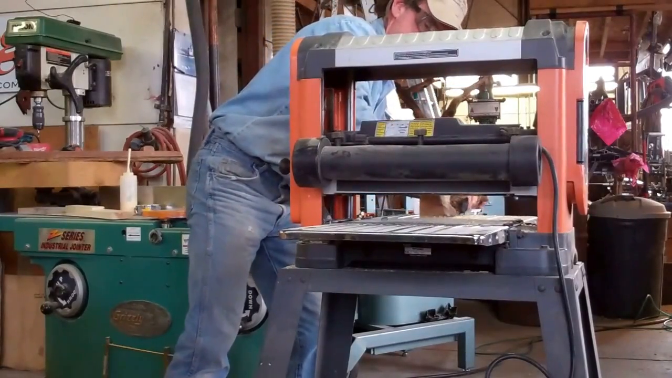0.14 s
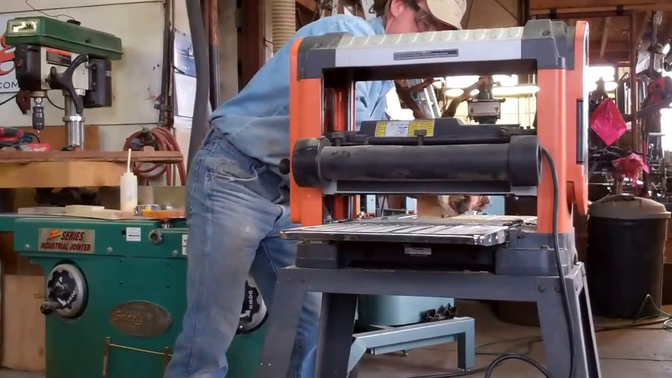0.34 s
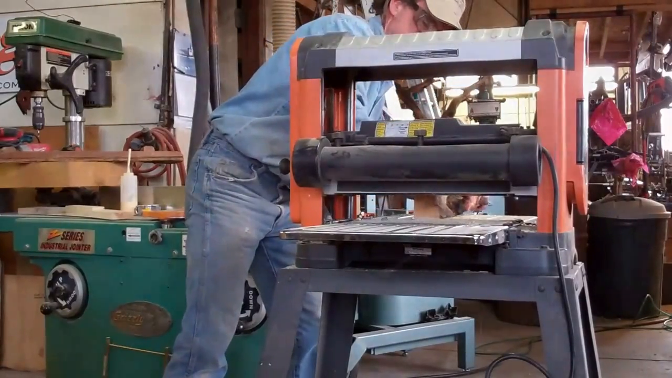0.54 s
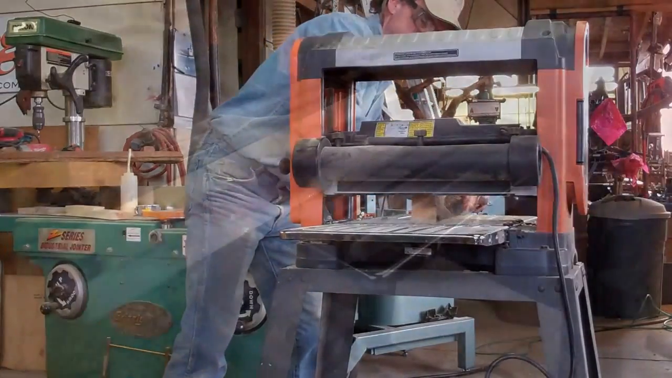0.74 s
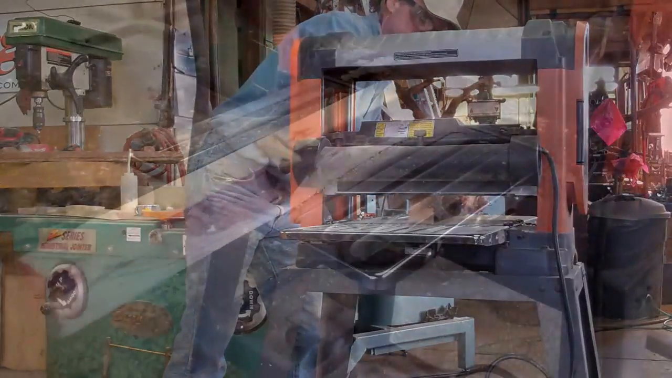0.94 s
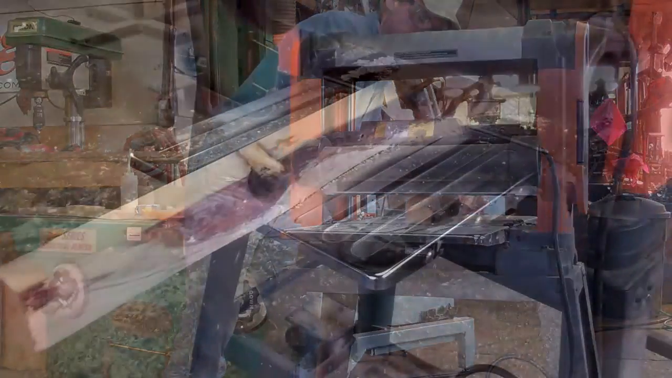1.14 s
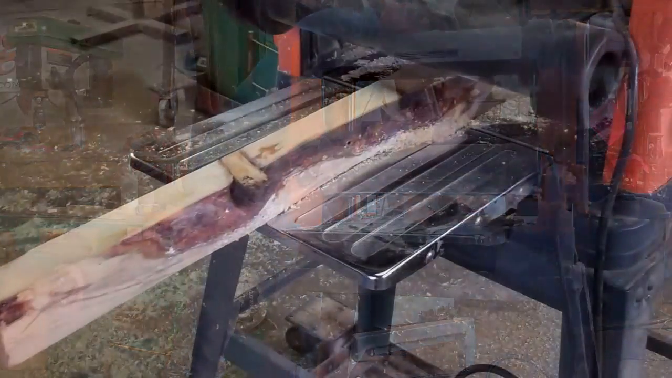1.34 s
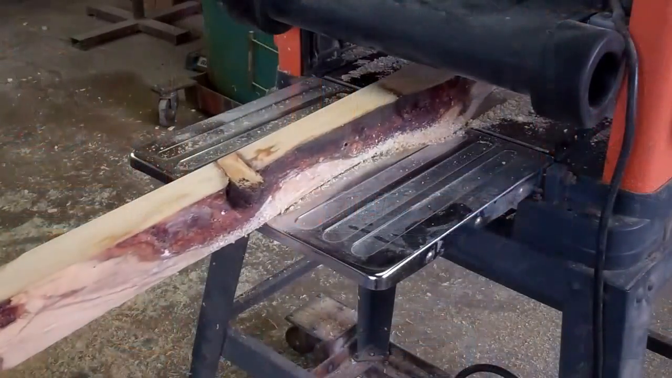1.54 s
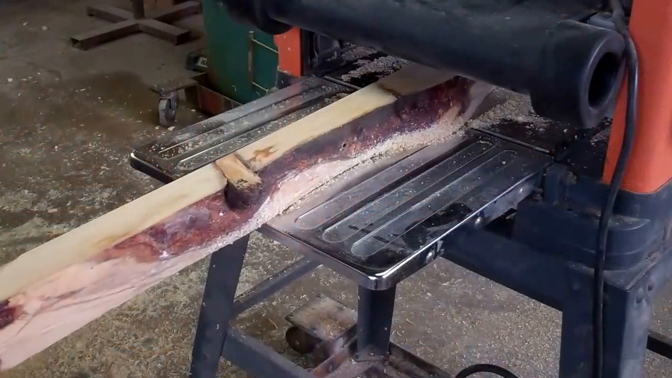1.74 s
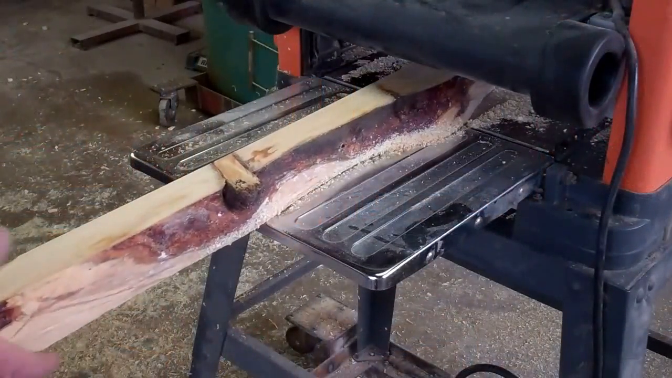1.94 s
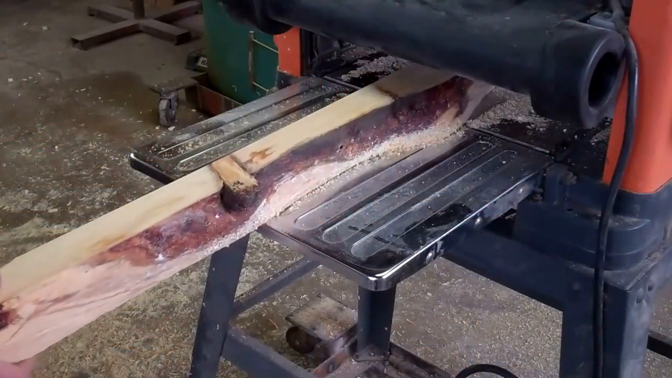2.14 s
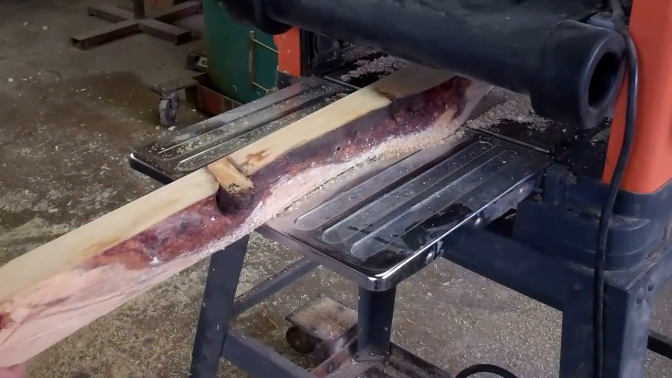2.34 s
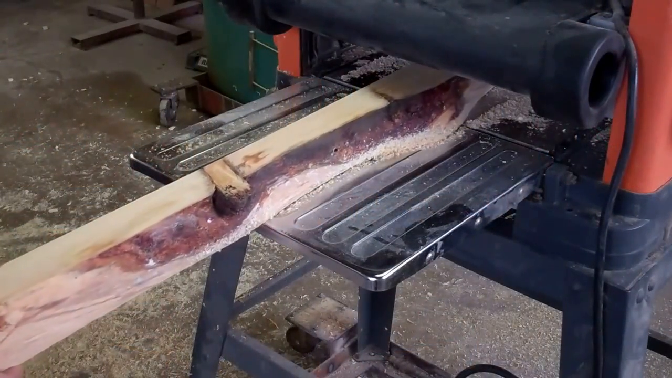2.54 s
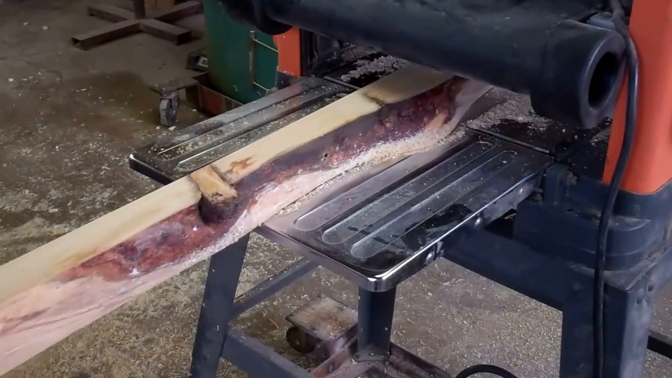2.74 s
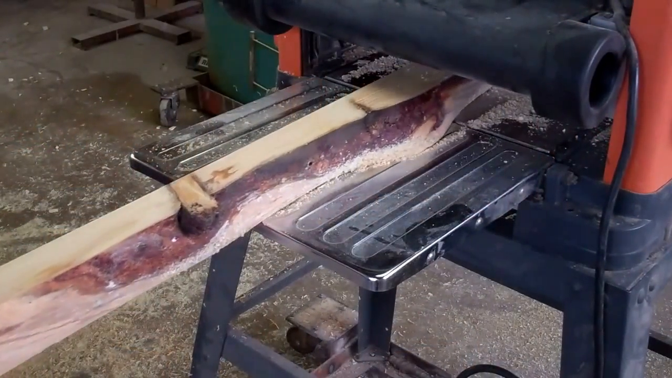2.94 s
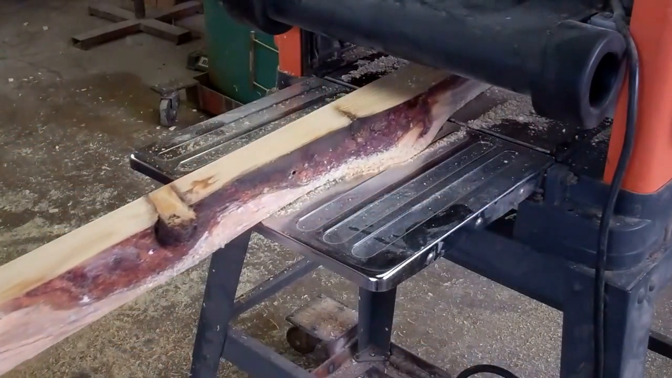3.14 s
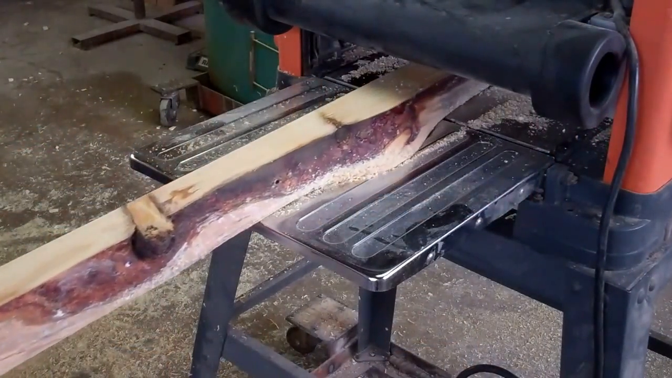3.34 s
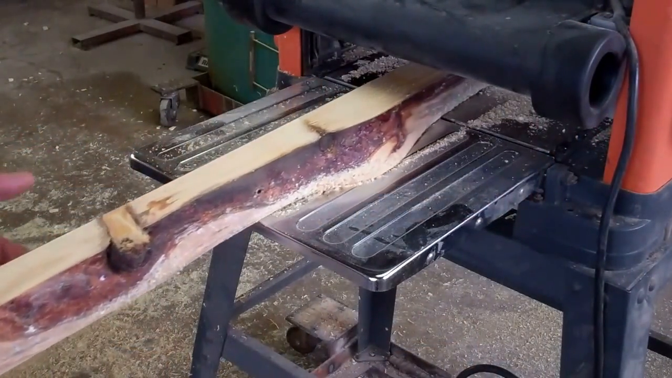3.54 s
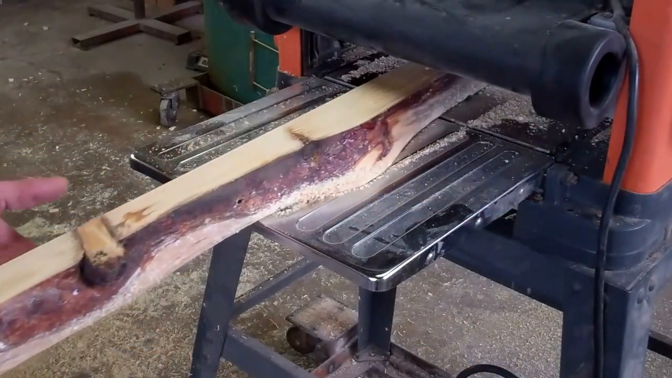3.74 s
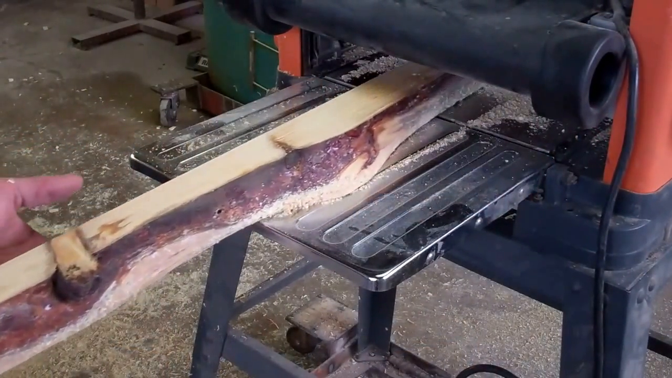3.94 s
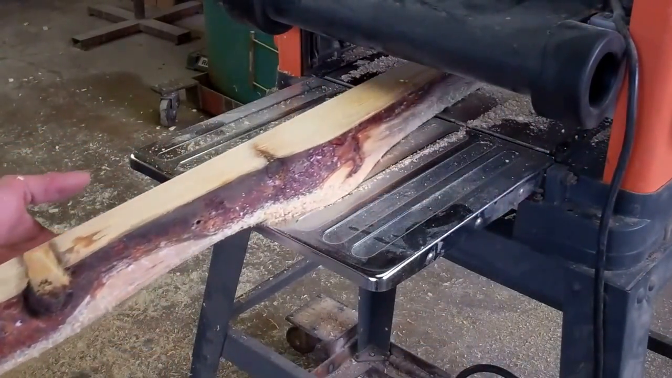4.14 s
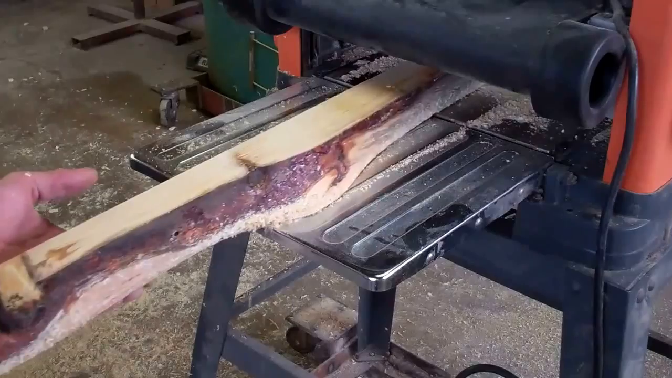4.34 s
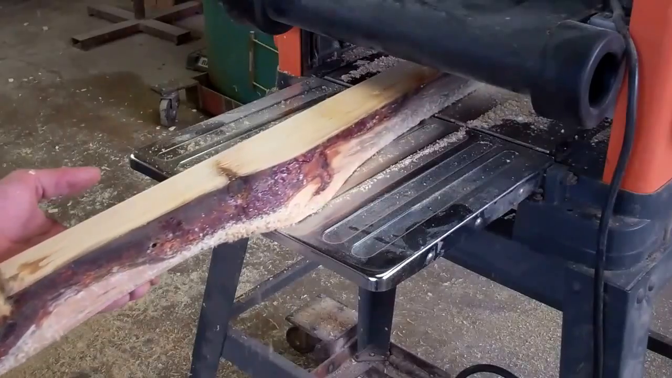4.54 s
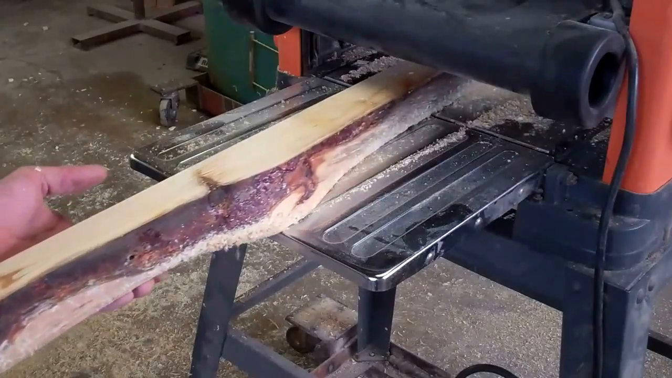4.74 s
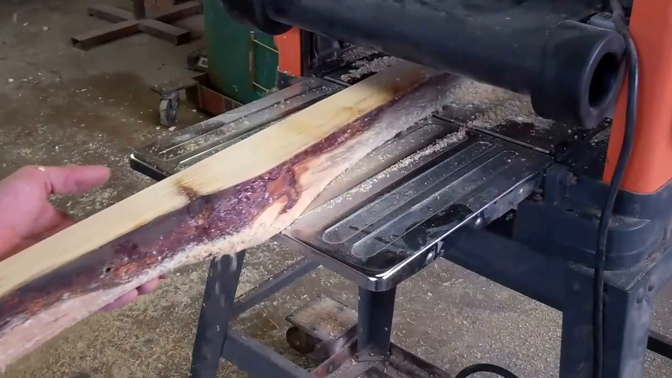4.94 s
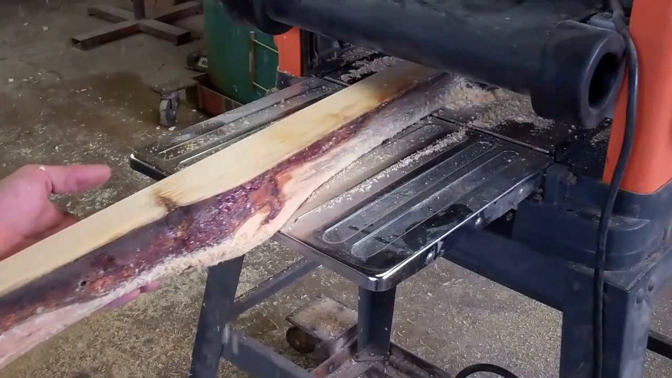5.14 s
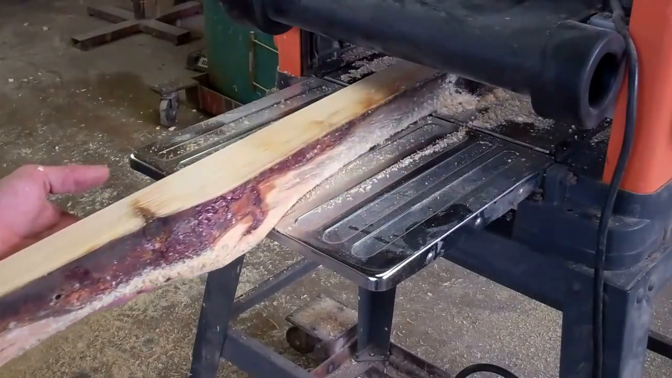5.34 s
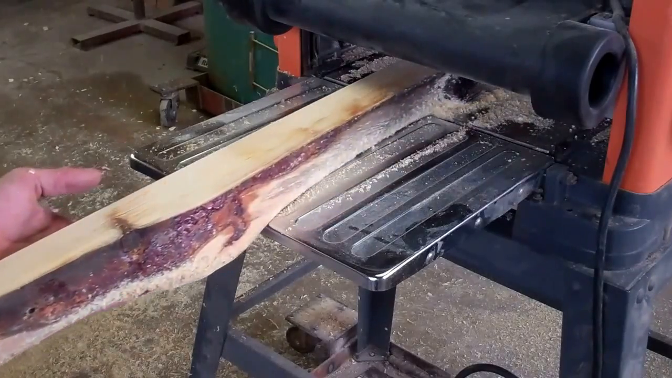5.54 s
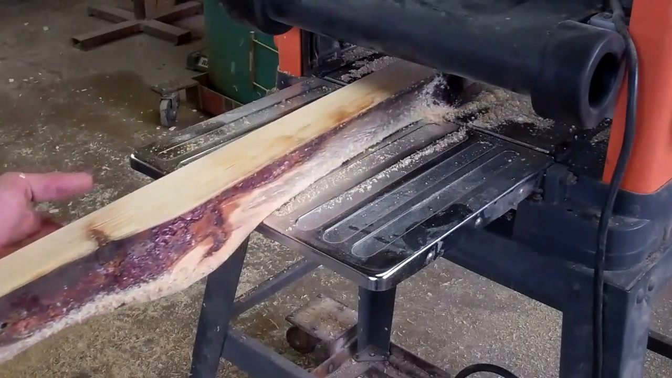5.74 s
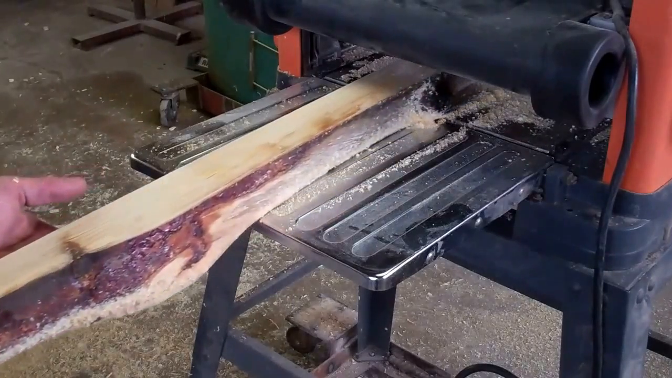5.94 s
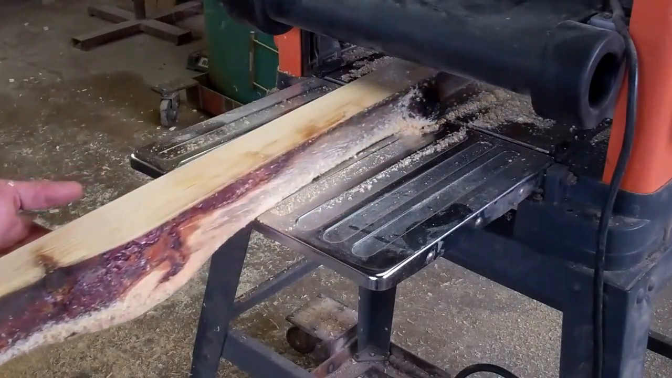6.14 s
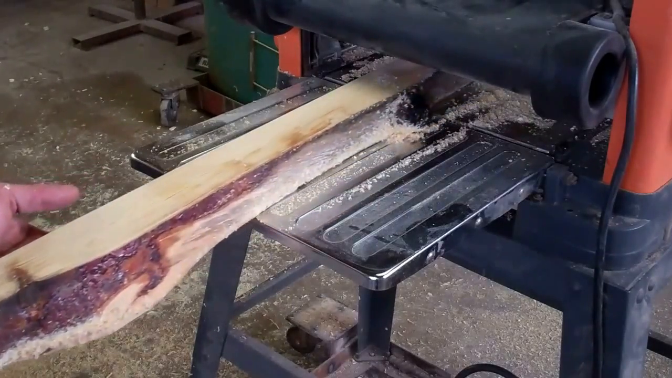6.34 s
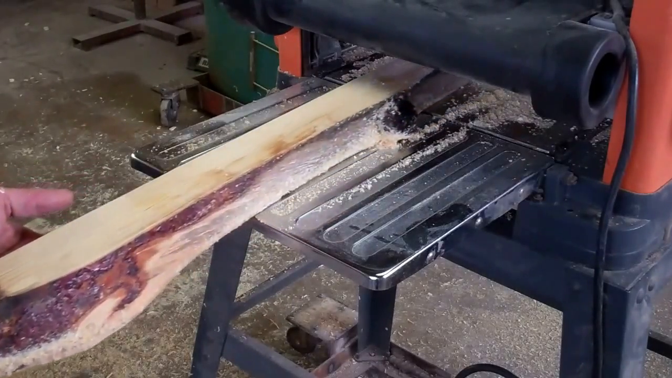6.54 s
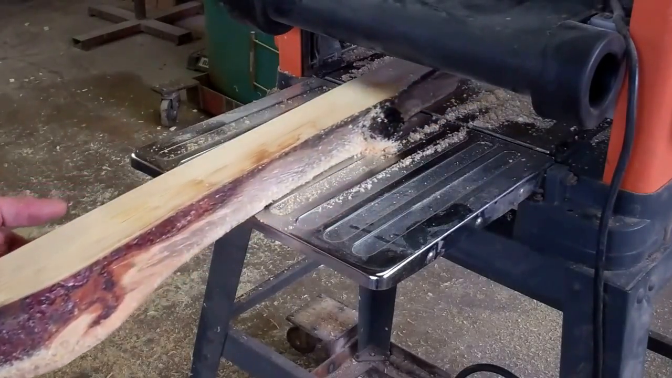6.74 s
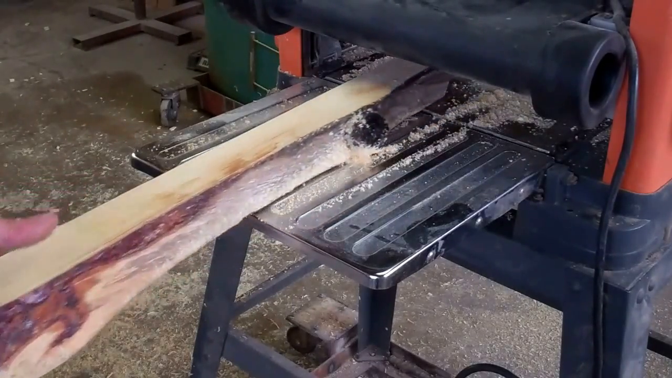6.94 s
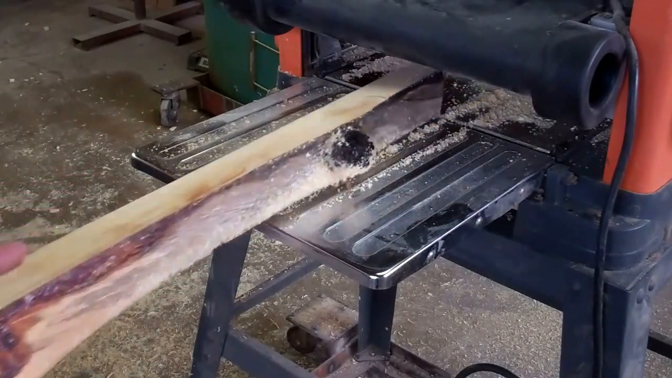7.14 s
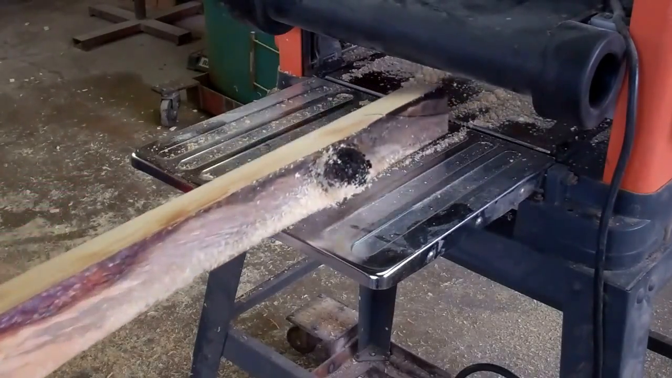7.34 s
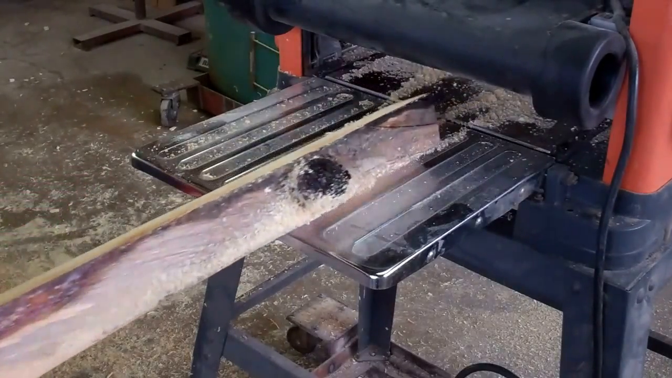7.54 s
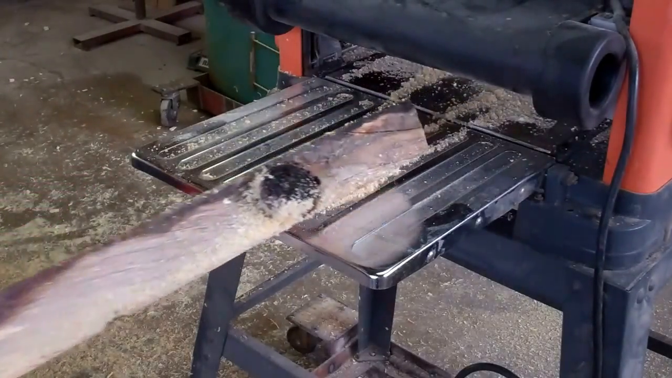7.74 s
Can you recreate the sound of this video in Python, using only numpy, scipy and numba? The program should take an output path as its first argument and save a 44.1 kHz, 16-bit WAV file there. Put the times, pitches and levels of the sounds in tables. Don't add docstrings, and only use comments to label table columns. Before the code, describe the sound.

In a workshop a planer runs up at a distance, a steady buzzing whine with airy rush. Half a second in, a slab clacks against the knives and cutting begins. The sound crossfades to a closer, louder position: rasping roar, singing wood resonances, knots tearing and a sharp crack. The slab leaves with a brief shriek and the head's hum rises. Stereo microphone, left louder and overloading on peaks.

```python
import sys
import numpy as np
from scipy import signal
from scipy.fft import rfft, irfft, next_fast_len
from scipy.io import wavfile
from scipy.ndimage import uniform_filter1d
from numba import njit

SR = 44100
rng = np.random.default_rng(int(sys.argv[2]) if len(sys.argv) > 2 else 0)


def master_out(mix):
    frames = np.transpose(np.atleast_2d(mix))
    ceiling = np.clip(frames, -1, 1)
    pcm = np.round(ceiling * 32767).astype(np.int16)
    wavfile.write(sys.argv[1], SR, pcm)


def volts(x):
    e = np.asarray(x, float) / 20
    return 10 ** e


N = 343980
STEP = 441
FRAMES = np.arange(N // STEP + 2) * STEP / SR

# (time [s], time [s])
DISSOLVE_S = (.6, 1.45)
# (time [s], time [s])
SLAB_IN_S = (0.5, 0.55)
# (time [s], time [s])
SLAB_OUT_S = (6.39, 6.43)

# (time [s], knife rate [Hz])
FAR_SPEED = [
    (0.0, 310.6),
    (0.2, 313.2),
    (0.47, 319.2),
    (0.6, 316.2),
    (0.9, 311.4),
    (1.2, 308),
]
# (time [s], knife rate [Hz])
NEAR_SPEED = [(0.6, 291.3), (1.05, 288), (1.4, 287.5), (1.7, 292.7), (2.1, 297), (2.4, 297.1), (3.2, 293),
              (4.4, 295.1), (4.6, 293.4), (4.8, 286.1), (5.0, 282.8), (5.25, 281.7), (5.85, 285),
              (6.38, 290.2), (6.6, 298.6), (6.9, 308.4), (7.5, 323.3), (7.8, 330.4)]
# (time [s], depth of cut [dB], splintering [dB])
FAR_LOAD = [
    (0.47, -1, -7),
    (0.52, 6, -1),
    (0.62, 3.5, -2),
    (0.75, 7, -3.5),
    (1.2, 4, -2.5),
]
# (time [s], depth of cut [dB], splintering [dB])
NEAR_LOAD = [(0.8, 14, -10), (1.2, 1, 0.5), (1.5, 2.5, -1.5), (2.5, -0.5, 0), (2.8, 2, 2), (3.1, 2.5, 0.5),
             (4.298, 1, 1), (4.55, 7.5, 2), (4.7, 1, 2.5), (4.9, 3.5, 0), (5.2, 0, 3.5), (5.4, -2.5, 9),
             (5.55, 1, 6.5), (5.72, 3, 2), (6.2, 0.5, 1), (6.3, 2, 0), (6.38, 14, 4), (6.45, 18, -3)]

# (frequency [Hz], density [dB per Hz])
ROAR = [(25, -50), (100, -33.5), (160, -21), (260, -13.5), (400, -9.5), (520, -12.5), (640, -5),
        (960, -3.5), (1250, -9.5), (2400, -7), (4000, -9), (5600, -11), (9000, -14), (14000, -14)]
# (frequency [Hz], likeness [0-1])
LIKENESS = [(60, .75), (130, 0.55), (600, 1), (1330, 0.95), (2870, 0.68), (6200, 0.33), (13500, 0.2)]
# (multiple of motor turn rate [-], level [dB])
MOTOR = [(1, -44.5), (2, -37), (7, -40), (13, -44), (15, -47), (24, -55), (36, -68)]
# (middle time [s], half length [s])
FAN_MUFFLED_S = [(4.86, 0.11), (5.56, .06)]
# (time [s], level [dB], frequency [Hz], decay by 60 dB [s])
KNOCKS = [
    (0.521, -7, 6800, 0.019),
    (.555, -14, 6700, .02),
    (.571, -12, 6400, .01),
    (5.451, 1, 3450, 0.0068),
]
# (multiple of knife rate [-], level [dB])
CHOP = [(.5, -48), (2, -28.5), (3, -30), (4, -41)]
# (knife rate [Hz], level [dB])
FAR_TONE = [(308, -30.5), (318, -29.5)]
# (knife rate [Hz], level [dB])
NEAR_TONE = [(281, -25.5), (286, -26.5), (289, -27), (292, -33.5), (294.5, -30.5), (297.5, -29), (308, -28),
             (315, -35), (324, -28.5)]

# (middle time [s], half length [s], frequency [Hz], level [dB])
FAR_RINGS = [(0.58, 0.09, 2600, -30.5), (0.62, 0.12, 1600, -32), (0.68, 0.11, 2200, -37),
             (0.657, 0.11, 9400, -37), (0.836, 0.38, 6660, -36), (0.98, 0.049, 4050, -32),
             (1.06, 0.082, 5640, -34)]
# (middle time [s], half length [s], frequency [Hz], level [dB])
BOOMS = [(1.2, 0.2, 3750, -27.5), (1.6, 0.46, 2720, -33.5), (2.2, 0.66, 590, -24),
         (2.88, 0.65, 2720, -33.5), (2.92, 0.48, 6648, -34.5), (3.04, 0.85, 4430, -32.5),
         (3.48, 0.64, 9300, -45), (3.56, 0.63, 600, -33.5), (3.76, 0.68, 2070, -26), (4.0, 1, 5640, -51),
         (4.12, 0.98, 6570, -35), (4.32, 0.72, 4300, -31), (4.44, 0.64, 2784, -24.5),
         (4.52, 0.29, 3270, -21), (4.72, 0.47, 1160, -25), (5.24, 0.53, 4540, -30.5),
         (5.56, 0.68, 2170, -27.5), (5.68, 0.45, 7000, -33.5), (5.72, 0.57, 8520, -33),
         (5.8, 0.19, 2750, -24), (5.88, 0.28, 7700, -46), (6.08, 0.64, 6160, -31), (6.12, 0.13, 703, -25.5),
         (6.12, 0.74, 4018, -27), (6.32, 0.13, 2460, -14.5), (6.32, 0.37, 4412, -24),
         (6.36, 0.34, 5140, -31), (6.36, 0.76, 9600, -38)]
# (middle time [s], half length [s], frequency [Hz],
# level [dB])
RINGS = [(1.12, 0.3, 2020, -32), (1.2, 0.19, 854, -29.5), (1.28, 0.2, 2300, -33), (1.28, 0.41, 4600, -35),
         (1.56, 0.13, 1450, -26), (1.72, 0.22, 1170, -29), (2.44, 0.68, 1810, -27), (2.72, 0.29, 3850, -33),
         (3.32, 0.97, 1471, -28), (3.56, 0.7, 3520, -26.5), (3.6, 0.26, 2000, -18.5),
         (4.04, 0.45, 1178, -31), (4.2, 0.45, 4140, -35), (4.64, 0.098, 875, -23), (4.68, 0.13, 2020, -27),
         (4.72, 0.2, 580, -21), (4.76, 0.13, 3740, -28), (4.76, 0.23, 1638, -14.5),
         (4.84, 0.073, 1500, -16), (4.92, 0.11, 2252, -22.5), (5.16, 0.13, 560, -34.5),
         (5.36, 0.23, 3130, -26.5), (5.6, 0.09, 3410, -23), (5.6, 0.086, 2270, -18),
         (5.76, 0.14, 1709, -25.5), (6.08, 0.49, 1412, -26), (6.32, 0.09, 1160, -24),
         (6.32, 0.14, 3170, -28),
         (1.24, 0.12, 6040, -34), (1.72, 0.21, 6590, -25), (2.84, 0.25, 8650, -35),
            (3.24, 0.15, 9360, -26), (3.24, 0.35, 7610, -28.5), (3.56, 0.21, 5570, -25),
            (3.84, 0.22, 6170, -31), (4.08, 0.27, 7100, -46), (4.52, .2, 5380, -21), (4.56, .13, 8220, -38),
            (4.64, 0.1, 6120, -26.5), (6.08, 0.18, 10250, -26), (2.72, 0.081, 1180, -30),
            (4.95, .07, 2550, -25), (5.4, 0.065, 8100, -26), (6.06, .07, 8900, -31),
            (6.25, 0.12, 4620, -33), (6.25, .12, 5210, -34), (4.45, 0.1, 2945, -25), (5.42, .05, 3950, -26),
            (4.0, 0.23, 2645, -33), (4.68, .08, 3200, -29), (6.14, .14, 4000, -28), (2.75, .07, 6780, -32)]
# (middle time [s], half length [s], frequency [Hz], level [dB])
GROWLS = [(1.7, 0.33, 680, -33), (1.88, 0.68, 1585, -34), (4.74, 0.24, 580, -31), (5.56, 0.1, 2750, -18.5),
          (5.6, 0.19, 1600, -29), (5.6, 0.15, 3690, -24), (6.12, 0.26, 720, -35)]
# (middle time [s], half length [s], tearing [dB], boom frequency [Hz], boom level [dB])
KNOTS = [(2.31, 0.066, 2, 2646, -32), (2.63, 0.1, -0.5, 2600, -31), (4.659, 0.074, 1, 1060, -27),
         (4.824, 0.051, .5, 1570, -17), (5.565, 0.11, 4.5, 2047, -27), (6.025, 0.055, 1, 570, -27),
         (6.384, .04, 4.5, 4567, -34)]

FAR_RING_WIDTH_HZ, BOOM_WIDTH_HZ, RING_WIDTH_HZ = 240, 352, 130
GROWL_WIDTH_HZ, KNOT_WIDTH_HZ = 213, 240
MAINS_HZ, MAINS_DB = 120, -63.5
MOTOR_RATIO, GEAR_RATIO, GEAR_DB = 36 / 34, 1.313, -43
FAN_DB, FAN_HALF_DB, FAN_WANDER_DB = -25.5, -30.5, 1.4
FAN_MUFFLE_DB, HALF_FADE_DB_PER_HZ = -6, -0.1834
BITE_DB, WEAK_KNIFE_DB = -33.5, -14
TEAR_DB, CHIPS_DB, TEAR_SHARE = -21.5, -22.5, 0.18
CHOKE_SHARE = 0.18
OPEN_BED_DB = 1
LEFT_MINUS_RIGHT_DB, TOP_LAG_RAD = 4.75, 2.9


def on_log_hz(table, hz):
    table_hz, value = np.transpose(table)
    return np.interp(np.log(np.maximum(hz, 1)), np.log(table_hz), value)


def walk(rate, count):
    k = max(int(SR / STEP / rate), 1)
    x = uniform_filter1d(uniform_filter1d(rng.standard_normal((count, len(FRAMES))), k), k)
    return x / x.std()


def smooth(track):
    return np.interp(np.arange(N) / SR, FRAMES, track)


def spell(s, half):
    return np.exp(-((FRAMES - s) / half) ** 4)


@njit
def stack(phase, gain, step):
    out = np.zeros((2, len(phase)))
    for i in range(len(phase)):
        j, a = i // step, (i % step) / step
        turn = np.exp(1j * phase[i])
        z = turn
        for k in range(gain.shape[2]):
            for ear in range(2):
                out[ear, i] += (z * ((1 - a) * gain[ear, j, k] + a * gain[ear, j + 1, k])).imag
            z *= turn
    return out


def tones(turns, hz, rms, rough, rate):
    count = len(rms)
    start = rng.uniform(0, 2 * np.pi, (count, 1))
    tremble = 1 + rough * (walk(rate, count) + 1j * walk(rate, count))
    mid = np.sqrt(2) * rms * np.exp(1j * start) * tremble
    multiple_hz = np.arange(1, count + 1)[:, None] * hz
    unlike = np.sqrt(1 - np.clip(on_log_hz(LIKENESS, multiple_hz), 0, 1))
    side = unlike * (0.22 * walk(3, count) + 0.38j * walk(3, count))
    ears = np.array([mid * np.exp(side), mid * np.exp(-side)])
    return stack(2 * np.pi * turns, np.ascontiguousarray(ears.transpose(0, 2, 1)), STEP)


def sparse(table, count, spacing=1):
    rms = np.zeros((count, 1))
    for multiple, db in table:
        rms[int(round(multiple / spacing)) - 1] = volts(db)
    return rms


def mains_hum():
    return np.sqrt(2) * volts(MAINS_DB) * np.sin(2 * np.pi * MAINS_HZ * np.arange(N) / SR)


def roar(turns, air_db, tear_db, chips_db, cutting, fade):
    size = next_fast_len(N)
    hz = np.fft.rfftfreq(size, 1 / SR)
    shape = volts(on_log_hz(ROAR, hz))
    like = np.clip(on_log_hz(LIKENESS, hz), 0, 1)
    mid, side = (rfft(rng.standard_normal(size)) * shape for _ in range(2))
    ears = np.array([mid * np.sqrt(1 + like) + sign * side * np.sqrt(1 - like) for sign in (1, -1)])
    unit = np.sqrt(np.mean(irfft(ears) ** 2))
    stroke = smooth(0.04 + 0.09 * cutting) * np.cos(2 * np.pi * turns)
    out = 0
    swell = walk(6.8, count=1)[0]
    for centre_hz in 30 * 2 ** np.arange(0, 9.6, 0.5):
        band = np.clip(1 - abs(2 * np.log2(np.maximum(hz, 1) / centre_hz)), 0, 1)
        high = np.interp(np.log(centre_hz), np.log((3000, 7000)), (0, 1))
        low = np.interp(np.log(centre_hz), np.log((900, 1800)), (1, 0))
        db = low * air_db + high * (chips_db + 8) + (1 - low - high) * (tear_db + 4.5)
        flicker = (0.8 + 0.7 * low + 0.4 * high) * walk(16, count=1)[0]
        db = db + 0.15 * swell + flicker
        pulse = 1 + (1 - low) * stroke
        out = out + smooth(fade * volts(db)) * pulse * irfft(ears * band)[:, :N] / unit
    return out


def motor(turns, hz, fan_db, half_db, fade):
    rms = fade * sparse(MOTOR, count=36) * volts(0.93 * walk(4.2, count=36))
    rms[11] = volts(fan_db + 2.0 * walk(25, count=1)[0])
    rms[5] = volts(half_db)
    whine = tones(MOTOR_RATIO * turns, MOTOR_RATIO * hz, rms, rough=0.27, rate=40)
    gear = tones(GEAR_RATIO * turns, GEAR_RATIO * hz, fade * volts([[GEAR_DB]]), rough=0.2, rate=15)
    return whine + gear


def knocks():
    out, t = np.zeros(N), np.arange(N) / SR
    for s, db, hz, ring in KNOCKS:
        age = np.maximum(t - s, 0)
        decay = np.exp(-np.log(1000) * age / ring)
        out += volts(db) * (t > s) * decay * np.sin(2 * np.pi * hz * age)
    return out


def widths(table, width_hz):
    return [(s, half, hz, width_hz, db) for s, half, hz, db in table]


def ringing(rings, multiple_hz, cutting):
    gain = np.zeros(multiple_hz.shape)
    for s, half, ring_hz, width_hz, db in rings:
        gain += volts(db) * spell(s, half) * np.exp(-((multiple_hz - ring_hz) / width_hz) ** 2)
    return gain * cutting


def knives(turns, hz, tone_db, bite_db, rings, growls, cutting, fade, count=96):
    multiple = np.arange(1, count + 1)[:, None] / 2
    wander_db = (2.0 + 0.083 * multiple) * walk(5.9, count)
    cut = 0.5 * volts(bite_db + wander_db) * (multiple / 8) ** -0.78 * (multiple > 3)
    cut += ringing(rings, multiple * hz, cutting)
    mismatch = volts(WEAK_KNIFE_DB - 2 + 2.04 * walk(2.2, count // 2))
    weak = mismatch * uniform_filter1d(cut[1::2], size=3, axis=0)
    cut[::2] = weak + ringing(growls, multiple[::2] * hz, cutting)
    cut[0] = 0
    open_gap = np.where(multiple > 1, 1 - 0.55 * cutting, 1)
    rms = cut + fade * sparse(CHOP, count, spacing=0.5) * open_gap
    rms[1] = volts(tone_db)
    jitter = 0.082 + 0.005 * multiple + 0.15 * (1 - cutting) * (multiple > 1)
    return tones(turns / 2, hz / 2, rms, rough=jitter, rate=25)


def planer(speed, load, tone, rings, growls, cutting, fade, air_db, machine_db, roar_db, fan_off_db, tone_fade):
    hz = np.interp(FRAMES, *np.transpose(speed))
    turns = np.cumsum(smooth(hz)) / SR
    s, *columns = np.transpose(load)
    depth_db, splinter_db = (np.interp(FRAMES, s, column) for column in columns)
    fade_db = 20 * np.log10(fade + 1e-4)
    steady = fade * volts(machine_db)

    tone_db = np.interp(hz, *np.transpose(tone)) + tone_fade * fade_db
    bite_db = BITE_DB + depth_db + machine_db + fade_db + 20 * np.log10(cutting + 0.02)
    lines = knives(turns, hz, tone_db, bite_db, rings, growls, cutting, steady)

    fan_db, half_db = fan_off_db + 1.9 * fade_db + FAN_WANDER_DB * walk(2.6, count=2)
    fan_db = fan_db + FAN_DB + FAN_MUFFLE_DB * sum(spell(*row) for row in FAN_MUFFLED_S)
    half_db = half_db + FAN_HALF_DB + HALF_FADE_DB_PER_HZ * (hz - 295)
    lines += motor(turns, hz, fan_db, half_db, steady)

    tear_db = TEAR_DB + roar_db + TEAR_SHARE * splinter_db
    tear_db = tear_db + sum(db * spell(s, half) for s, half, db, *_ in KNOTS)
    chips_db = CHIPS_DB + splinter_db
    air_db = air_db - CHOKE_SHARE * splinter_db
    audible = smooth(np.clip(8 * fade, 0, 1))
    return audible * lines + roar(turns, air_db, tear_db, chips_db, cutting, fade ** 0.97)


def scene():
    near = np.interp(FRAMES, DISSOLVE_S, (0, 1))
    slab_in = np.interp(FRAMES, SLAB_IN_S, (0, 1))
    slab_out = np.interp(FRAMES, SLAB_OUT_S, (0, 1))
    far_rings = widths(FAR_RINGS, FAR_RING_WIDTH_HZ)
    far_view = planer(FAR_SPEED, FAR_LOAD, FAR_TONE, far_rings, [], slab_in, 1 - near,
                      air_db=-20.5, machine_db=-4.5, roar_db=-2.5, fan_off_db=-11.5, tone_fade=2.4)
    knot_booms = [(s, half, hz, db) for s, half, _, hz, db in KNOTS]
    rings = widths(BOOMS, BOOM_WIDTH_HZ) + widths(RINGS, RING_WIDTH_HZ)
    rings += widths(knot_booms, KNOT_WIDTH_HZ)
    growls = widths(GROWLS, GROWL_WIDTH_HZ)
    open_db = OPEN_BED_DB * slab_out
    near_view = planer(NEAR_SPEED, NEAR_LOAD, NEAR_TONE, rings, growls, 1 - slab_out, near,
                       air_db=-18, machine_db=-1.0, roar_db=0.13 + open_db,
                       fan_off_db=-0.8 + 1.7 * open_db, tone_fade=0.58)
    return mains_hum() + far_view + knocks() + near_view


def roll_off(x):
    return signal.sosfilt(signal.butter(12, 14110, fs=SR, output="sos"), x)


def record(dry):
    size = next_fast_len(N)
    hz = np.fft.rfftfreq(size, 1 / SR)
    lag = np.exp(-1j * TOP_LAG_RAD * (hz / 14000) ** 2)
    left = irfft(rfft(dry[0], size) * lag)[:N]
    sides = np.array([left * volts(LEFT_MINUS_RIGHT_DB / 2), dry[1] * volts(-LEFT_MINUS_RIGHT_DB / 2)])
    return roll_off(np.clip(sides, -1, 1))


dry = scene()
out = record(dry)
master_out(out)
```